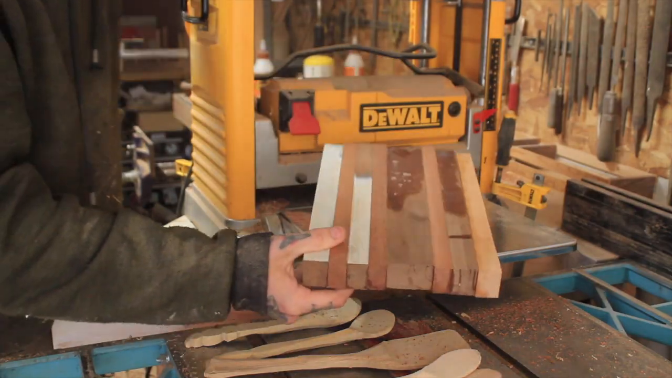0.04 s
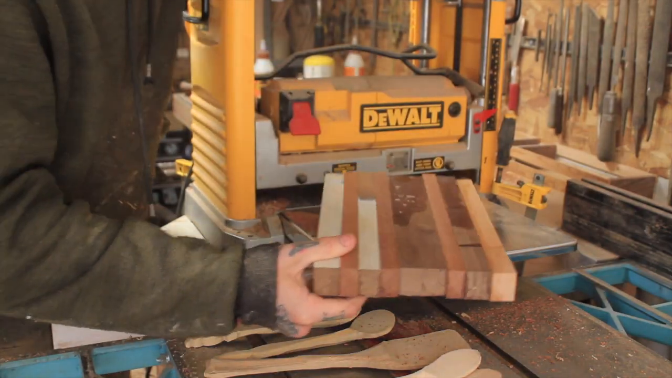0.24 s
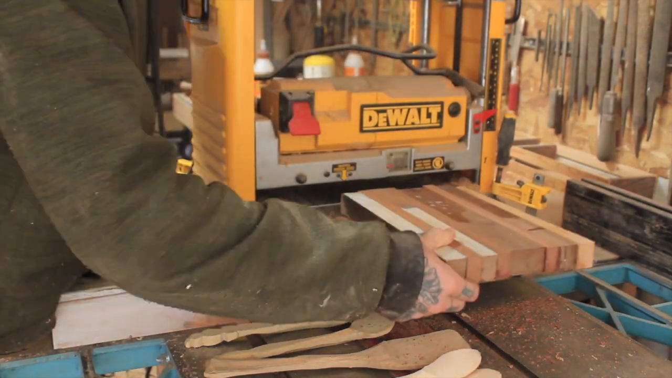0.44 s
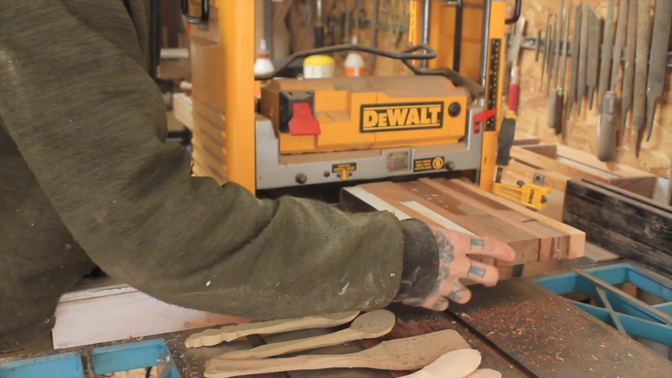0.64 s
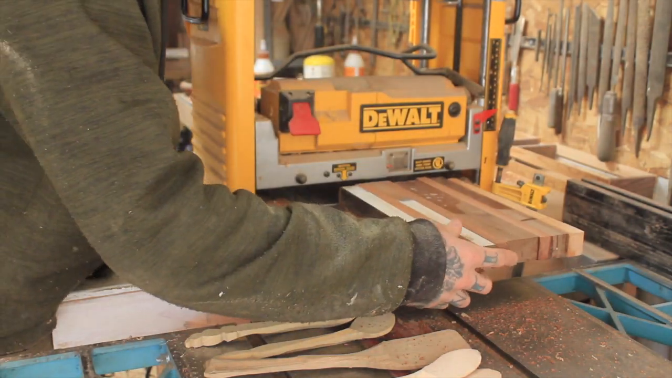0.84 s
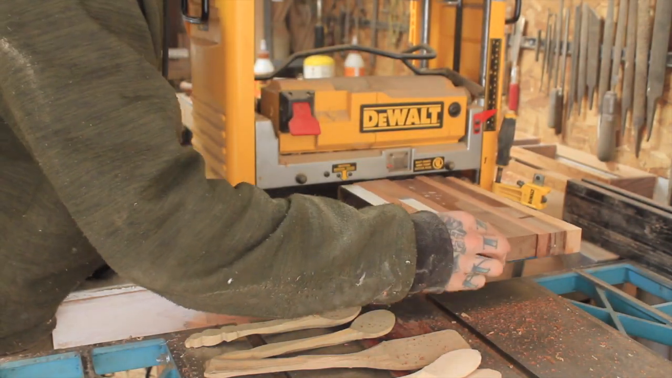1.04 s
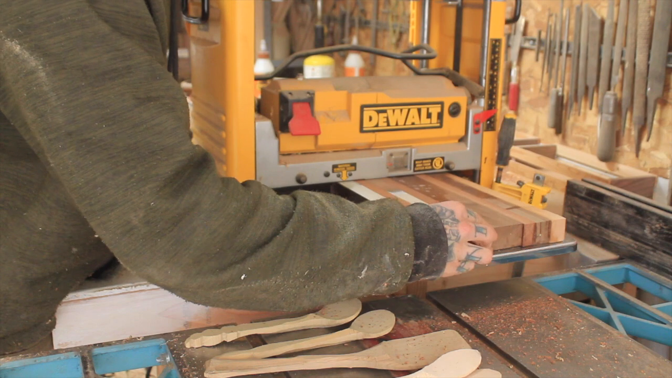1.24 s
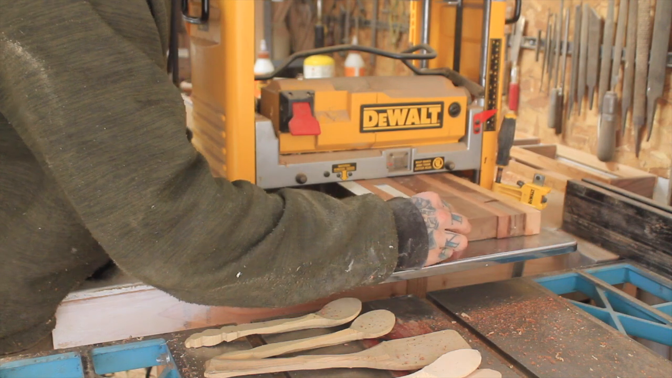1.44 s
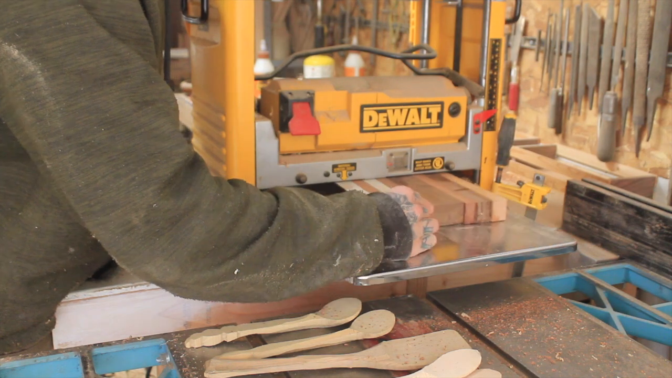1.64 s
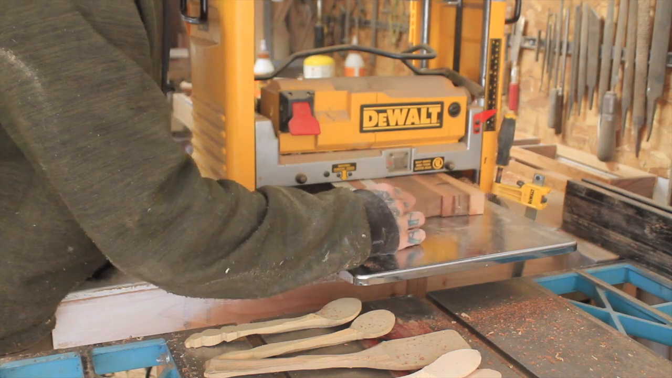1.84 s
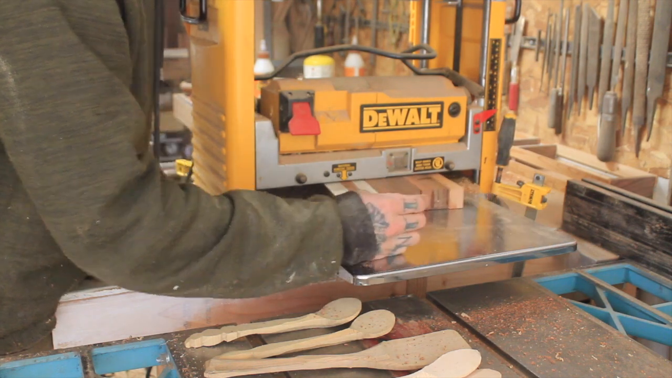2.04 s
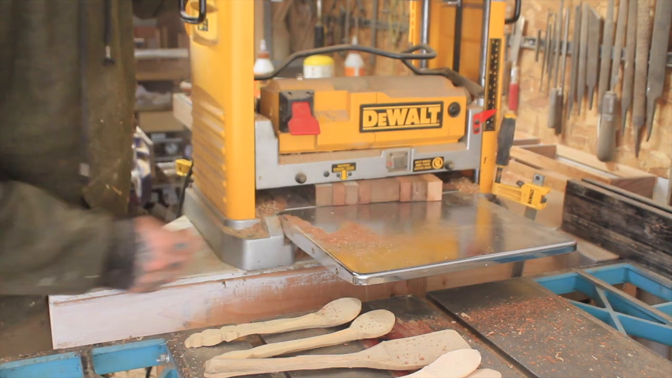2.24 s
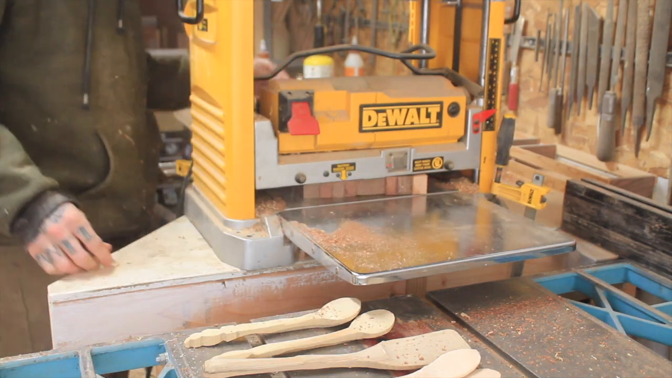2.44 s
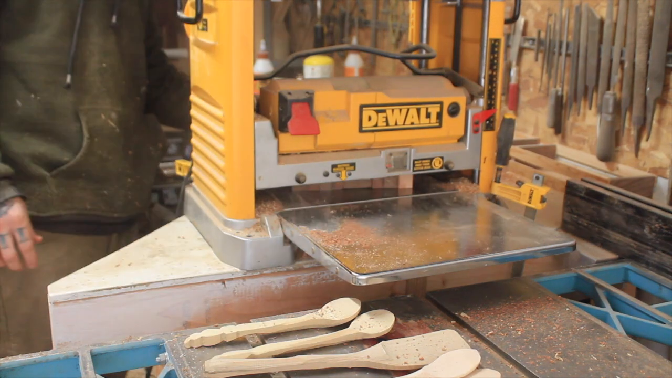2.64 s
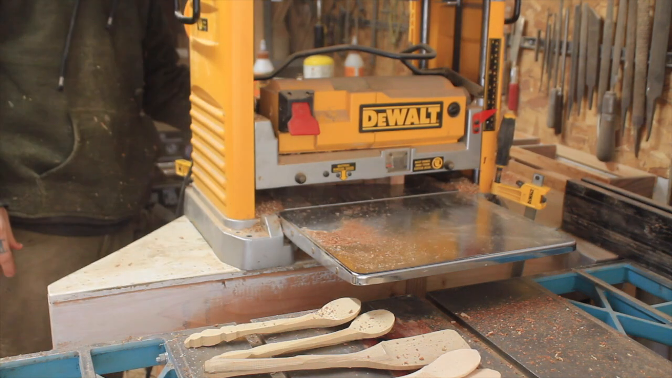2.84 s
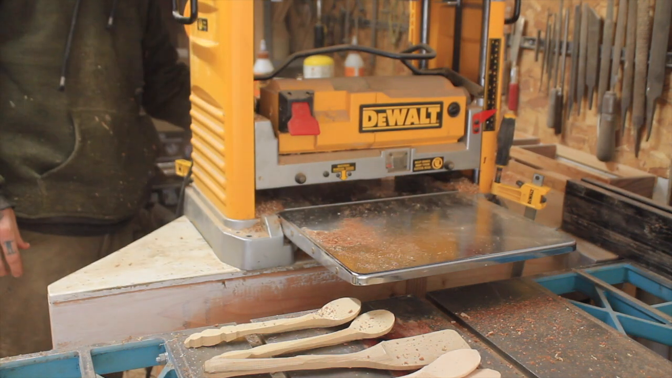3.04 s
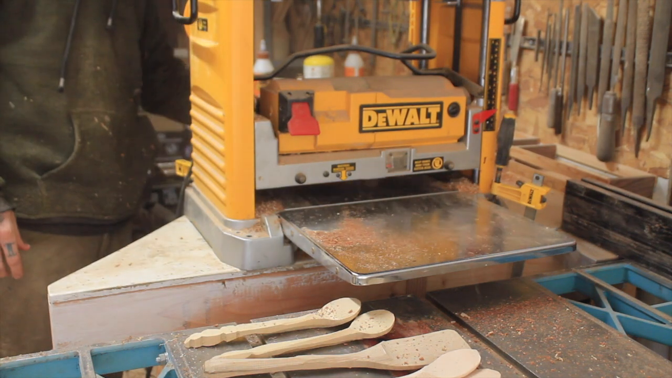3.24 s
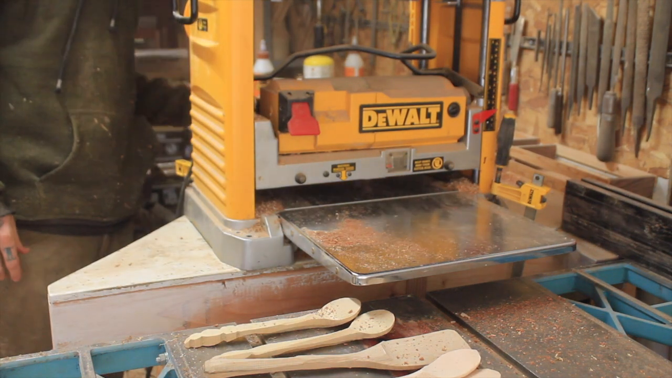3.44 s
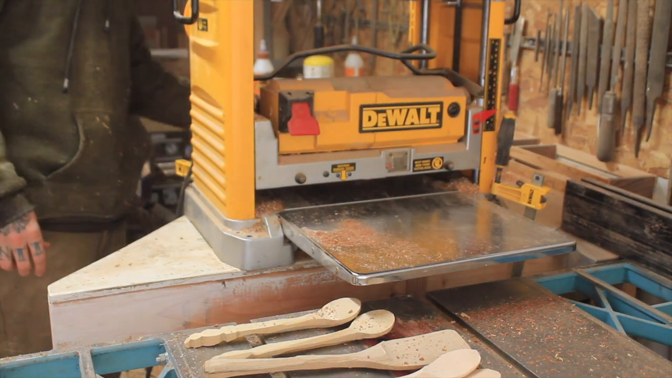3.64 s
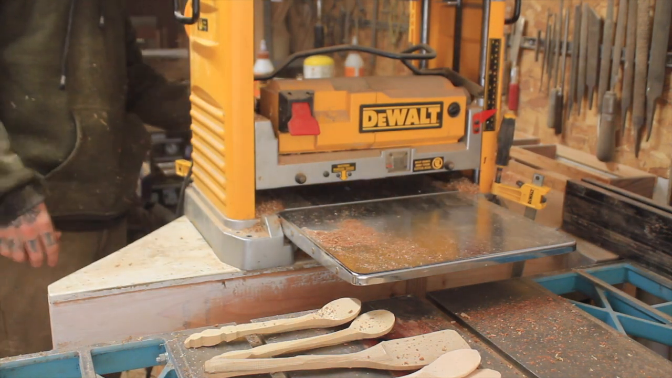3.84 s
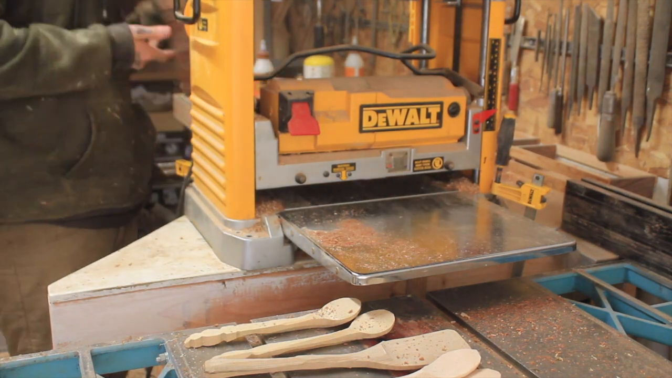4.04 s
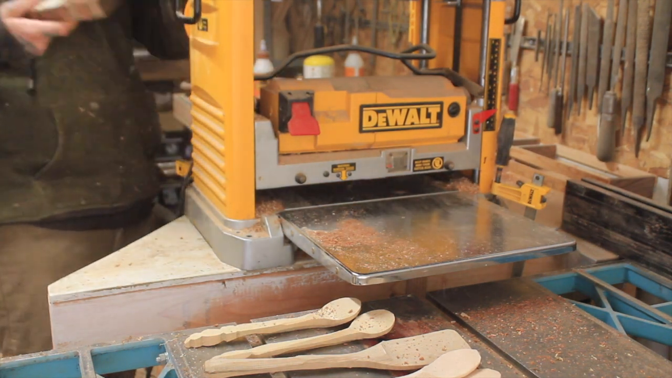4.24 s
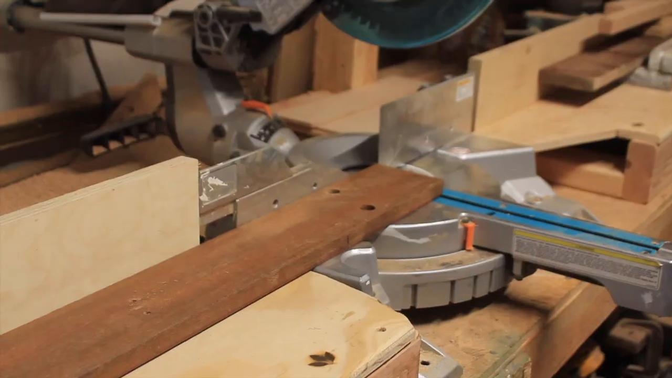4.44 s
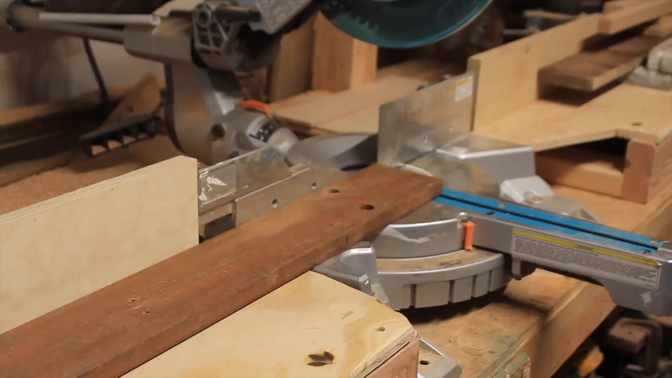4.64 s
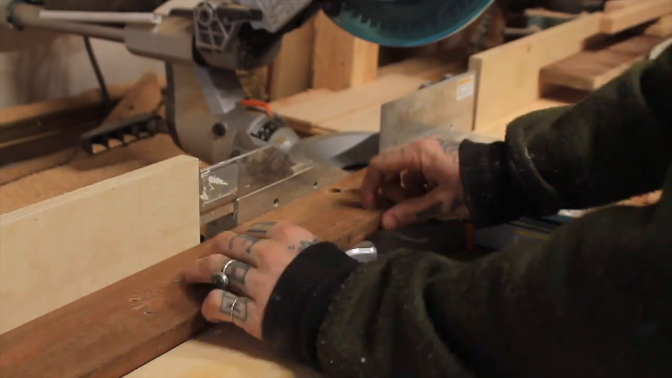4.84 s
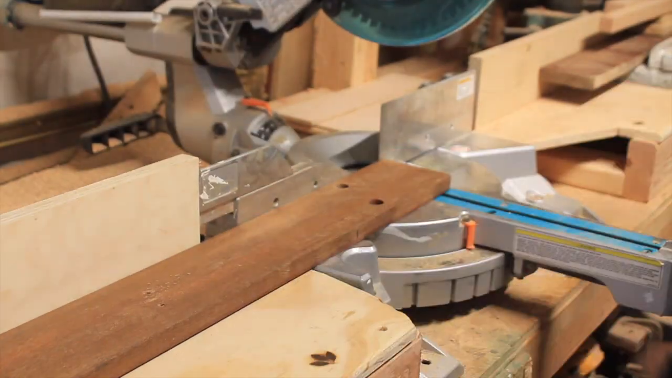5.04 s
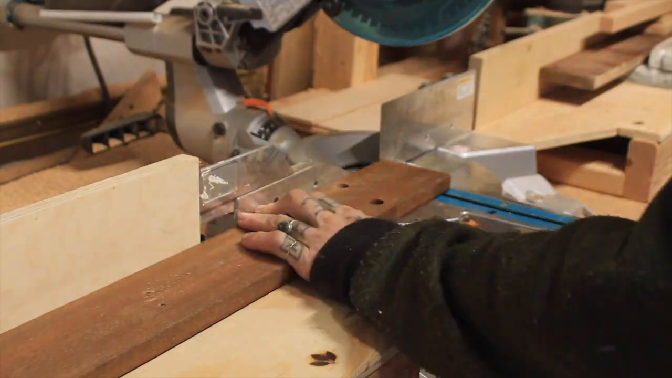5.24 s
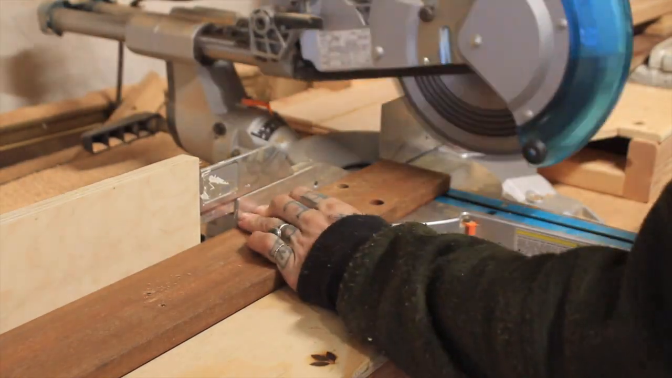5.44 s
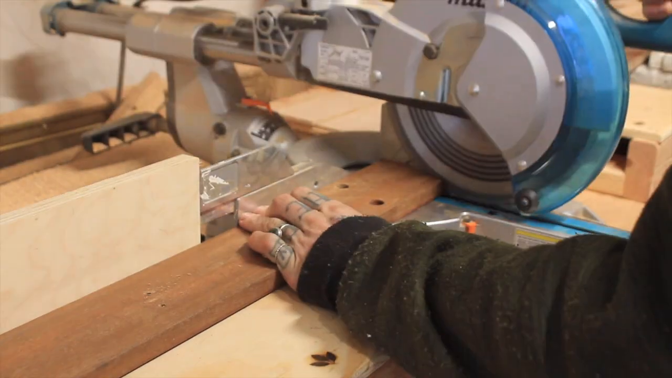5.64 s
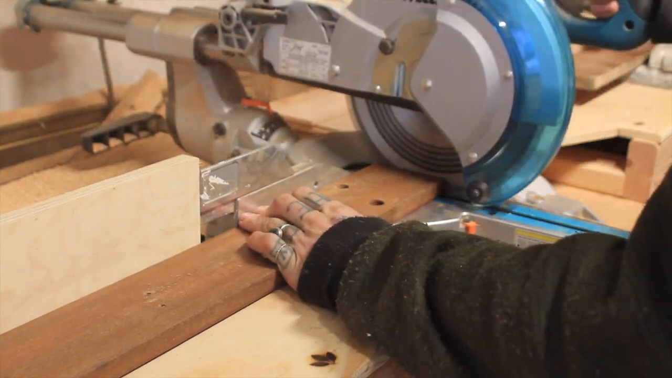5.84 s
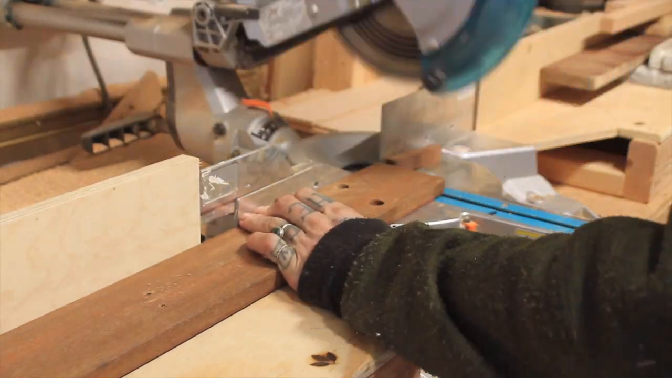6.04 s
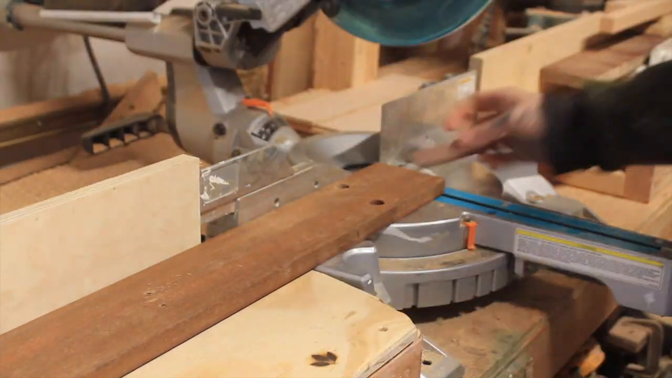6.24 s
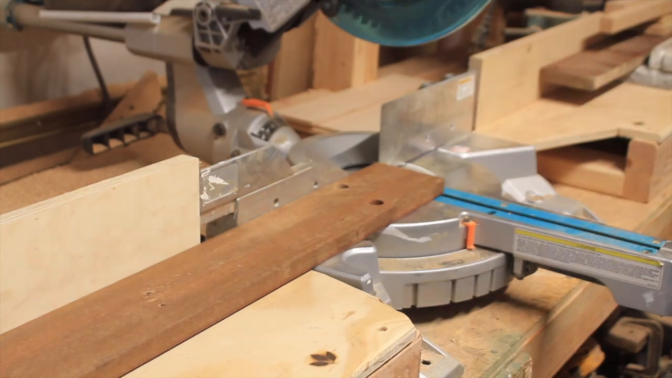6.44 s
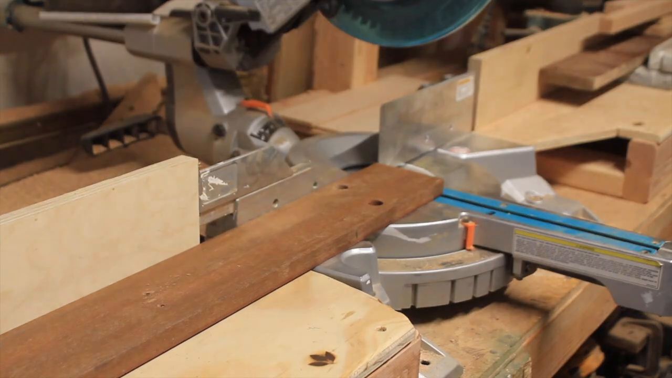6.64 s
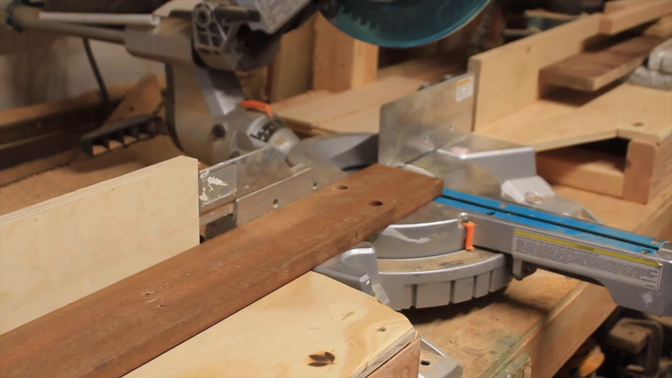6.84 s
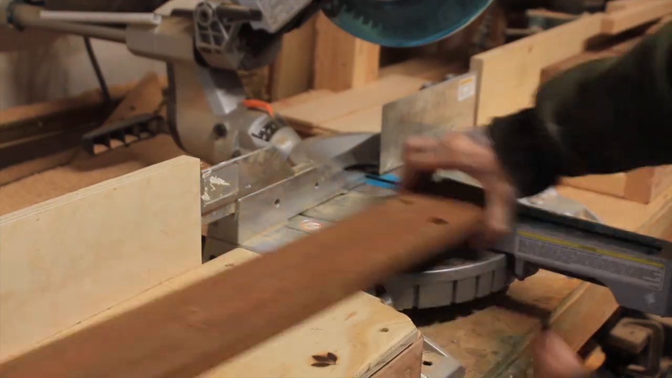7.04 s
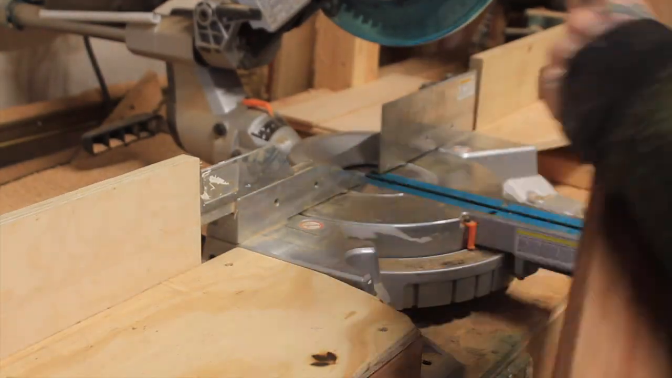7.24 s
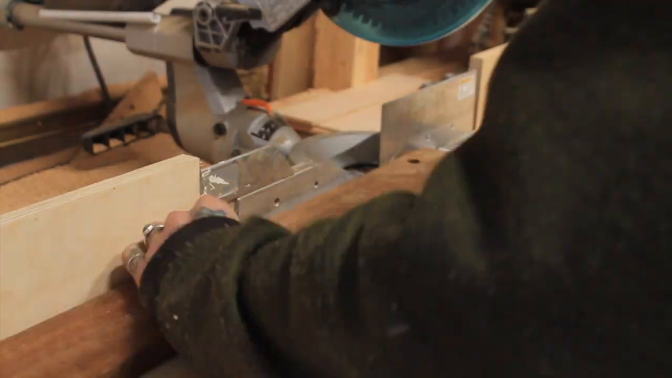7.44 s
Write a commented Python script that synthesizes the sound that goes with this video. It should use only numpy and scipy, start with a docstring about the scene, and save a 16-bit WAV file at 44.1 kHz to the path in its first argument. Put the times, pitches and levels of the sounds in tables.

```python
"""In a small workshop a thickness planer whines, sags while its knives chew through a board, and recovers.
Abruptly the scene is a mitre saw: a board is slid into place, the motor kicks up and brakes,
the blade rings on, and the board is knocked about on the table.
Spinning machines are sums of tones that follow a speed curve, plus noise for rushing air.
Knocks, clicks and slides are short bursts of noise shaped by resonances."""
import sys
import numpy as np
from scipy import signal
from scipy.fft import rfft, irfft, next_fast_len
from scipy.io import wavfile
from scipy.ndimage import uniform_filter1d

SR = 44100
rng = np.random.default_rng(int(sys.argv[2]) if len(sys.argv) > 2 else 0)


def inscribe(sig):
    """Save sig as 16-bit PCM at rate SR to the path in sys.argv[1].

    A 1-D sig is mono; a 2-D sig holds one channel per row.
    Samples are clipped to [-1, 1] before scaling.
    """
    pcm = np.round(np.clip(np.atleast_2d(sig).T, -1, 1) * 32767)
    wavfile.write(sys.argv[1], SR, pcm.astype(np.int16))


N = 331191
T = np.arange(N) / SR  # time [s]

EDGE_HZ = 15780  # upper limit of the sound
IDLE_HZ, PLANER_END = 572.55, 4.366  # knife strokes per second at idle; when the planer scene stops [s]
CUT_START, CUT_END, BITE_RISE_S = 1.615, 3.26, 0.019  # board under the knives from, to [s]; ramp length
SAW_ON, SAW_OFF = 5.45, 6.33  # when the saw starts and when its last motor sound ends [s]

# Spectrum of the planer's air noise and chips: (frequency [Hz], relative level [dB per Hz])
AIR_RUSH = [(100, -45), (300, -105), (520, -11.5), (700, -19), (950, -7), (1300, -1), (1680, 4),
            (2050, -1.5), (2600, 3.5), (3900, -1), (5200, 3.5), (7600, 6.5), (11000, 3.5), (15500, 6)]


def amp(db):
    """Turns decibels into a plain factor."""
    return 10 ** (np.asarray(db) / 20)


def unit(x):
    """Brings a sound to an average (RMS) level of one."""
    return x / np.sqrt(np.mean(x ** 2) + 1e-20)


def read(points, hz):
    """Reads a spectrum in dB, joined on a log-frequency axis."""
    f, db = np.transpose(points)
    return np.interp(np.log(hz + 1), np.log(f + 1), db)


def between(start, end, fade):
    """One from start to end, with short ramps outside."""
    return np.clip((T - start) / fade + 1, 0, 1) * np.clip((end - T) / fade + 1, 0, 1)


def swell(start, end, rise, fall):
    """Attack, hold and release between start and end."""
    return np.clip((T - start) / rise, 0, 1) * np.clip((end - T) / fall, 0, 1)


def bump(hz, centre, width):
    """Shape of a resonance, one at its centre."""
    return 1 / (1 + ((hz - centre) / width) ** 2)


def add(mix, s, sound):
    """Adds a sound to the mix at s seconds."""
    part = mix[round(s * SR):][:len(sound)]
    part += sound[:len(part)]


def drift(rate):
    """Joins random points of unit size, rate per second; after 4096 points the last value holds."""
    knots = rng.standard_normal(4096)
    return np.interp(T * rate, np.arange(len(knots)), knots)


def colour(x, points):
    """Gives a sound a spectrum, at unit level."""
    gain = amp(read(points, np.fft.rfftfreq(len(x), 1 / SR)))
    return unit(irfft(rfft(x) * gain, len(x)))


def noise(points):
    """Steady noise with a given spectrum, at unit level."""
    return colour(rng.standard_normal(next_fast_len(N)), points)[:N]


def bright(x, hz, q):
    """A resonance that rings only after it is hit; a low q makes it broad."""
    b, a = signal.bilinear([1 / q, 0], [1, 1 / q, 1], SR / (2 * np.pi * hz))
    return signal.lfilter(b, a, x)


def thinned(x, hz):
    """Small objects radiate little bass."""
    return signal.lfilter(*signal.butter(1, hz, "high", fs=SR), x)


def reflected(x, wet_db, t60):
    """Adds the dense echoes of nearby bench, walls and housings; they fall 60 dB in t60 seconds."""
    t = T[:8000]
    echoes = rng.standard_normal(len(t)) * amp(-60 * t / t60)
    wet = signal.oaconvolve(x, echoes / np.linalg.norm(echoes))[:len(x)]
    return (x + amp(wet_db) * wet) / np.hypot(1, amp(wet_db))


def crack(hz, t60, q, tail_db=-27, tail_t60=0.073):
    """A quickly dying burst of noise, coloured by a broad resonance, with a faint room tail."""
    t = T[:8000]
    fall = amp(-60 * t / t60) + amp(tail_db - 60 * t / tail_t60)
    burst = bright(rng.standard_normal(len(t)) * fall, hz, q)
    filter_gain = np.linalg.norm(bright(signal.unit_impulse(len(t)), hz, q))
    return burst / filter_gain


def shop(hiss_db=-52.5):
    """Quiet room noise, and between planer and saw a faint, wavering hum that slowly rises."""
    # Room noise: (frequency [Hz], relative level [dB per Hz])
    room_spectrum = [(35, -46), (60, -27.5), (613, -1.5), (773, -5.5), (8870, -14), (9510, -12),
                     (13500, -18), (15500, -23)]
    # Faint hum: (starting pitch [Hz], rise [Hz per s], level [dB])
    hum_tones = [(420, 30, -64.5), (585, 36, -65)]
    age = T - PLANER_END
    hum = 0
    for hz, rise, db in hum_tones:
        turns = (hz + rise * age / 2) * age
        hum = hum + amp(db + 2 * drift(13)) * np.sin(2 * np.pi * turns)
    room = noise(room_spectrum) * amp(hiss_db + .5 * drift(39))
    return room + hum * between(PLANER_END, SAW_ON, 0.12)


def ticks(per_s=16, level_db=-46, spread_db=3, hz=2800, t60=0.059):
    """Light taps at random moments and pitches while the board is handled."""
    # Spells of handling: (start [s], end [s])
    spells = [(4.37, 4.48), (6.799, 7.05)]
    out = np.zeros(N)
    for start, end in spells:
        for s in np.arange(start, end, 1 / per_s):
            size = amp(level_db + spread_db * rng.standard_normal())
            tap = crack(hz * 2 ** rng.uniform(-1.3, 1), t60, q=0.24)
            add(out, s + rng.random() / per_s, size * tap)
    return out


def sliding(grain_db=3, q=0.095, cut_hz=300, ring=0.7):
    """Friction: clumps of tiny slips under a smooth stroke, coloured by the table's short ring."""
    # Wood and sleeve sliding on the table: (time [s], length [s], level [dB], brightness [Hz])
    strokes = [(4.457, 0.09, -42.5, 3440), (4.866, 0.024, -38.5, 6960), (4.911, 0.025, -40.5, 7000),
               (4.939, 0.04, -34.5, 7700), (5.018, 0.031, -41.5, 6960), (5.232, 0.036, -42.5, 5880),
               (5.333, 0.081, -33.5, 4344), (7.078, 0.038, -26.5, 7150), (7.137, 0.043, -29.5, 3860),
               (7.186, 0.07, -42.5, 9000), (7.345, 0.166, -43.5, 8000), (7.415, 0.033, -22.5, 3660)]
    # Resonances of the saw table under a sliding board: (frequency [Hz])
    table_hz = [1850, 3240, 8200]
    out = np.zeros(N)
    slips = rng.standard_normal(N) * amp(grain_db * drift(470))
    slips = slips + ring * sum(bright(slips, hz, q=9.5) for hz in table_hz)
    for s, length, db, hz in strokes:
        piece = slips[round(s * SR):][:round(length * SR)]
        stroke = unit(bright(piece, hz, q))
        add(out, s, amp(db) * stroke * signal.windows.hann(len(stroke)) ** .5)
    return thinned(out, cut_hz)


def clatter(cut_hz=330, wood_q=0.64, top_hz=11500):
    """Knocks ring those modes of the board that the contact favours; clicks are short and bright."""
    # Board knocks: (time [s], level [dB], brightness [Hz], 60 dB decay [s], relative board ring [dB])
    knocks = [(4.404, -30, 1060, 0.091, 3.5), (4.75, -42, 2500, 0.13, 5.5), (5.219, -43, 1487, 0.032, 0),
              (5.34, -31.5, 3960, 0.053, -5), (6.58, -30.5, 1190, 0.03, 0),
              (6.737, -35.5, 1770, 0.017, -0.5), (7.086, -25.5, 1500, 0.028, -1),
              (7.114, -16.5, 2200, 0.047, -0.5), (7.19, -10.5, 1320, 0.029, 1.5),
              (7.408, -15.5, 1850, 0.039, -1.5), (7.434, -23, 2230, 0.066, -3), (7.483, 2, 2470, 0.02, -7),
              (7.501, -17, 1500, 0.036, -5)]
    # Ringing modes of the board: (frequency [Hz], relative level [dB], 60 dB decay [s])
    board_modes = [(464, -15.5, 0.12), (624, -28, 0.17), (767, -19, 0.082), (952, -0.5, 0.028),
                   (1567, -3.5, 0.027), (2134, -14.5, 0.043), (3190, -2, 0.02)]
    # Hard clicks of trigger, guard and fence: (time [s], level [dB], brightness [Hz], 60 dB decay [s])
    clicks = [(4.417, -24.5, 7400, 0.046), (5.008, -45, 8000, 0.022), (5.024, -38, 8000, 0.03),
              (5.055, -39, 4000, 0.022), (5.312, -39.5, 8000, .04), (5.394, -13, 6500, 0.024),
              (6.05, -22.5, 3580, 0.065), (6.201, -19, 2790, 0.091), (6.789, 8, 6150, 0.012),
              (6.8279, -18.5, 9100, 0.04), (7.178, -21, 7500, 0.019), (7.302, -36, 9300, 0.077),
              (7.483, -1.5, 5960, 0.034)]
    out, t = np.zeros(N), T[:8000]
    for s, db, hz, t60, ring_db in knocks:
        ring = 0
        for f, d, decay in board_modes:
            mode_hz = f * (1 + 0.012 * rng.standard_normal())  # each knock is tuned a little differently
            ring = ring + amp(d - 60 * t / decay) * np.sin(2 * np.pi * mode_hz * t)
        contact = crack(hz, t60, q=1.24)
        add(out, s, amp(db) * (contact + amp(ring_db) * bright(ring, hz, wood_q)))
    soften = signal.butter(2, min(top_hz, EDGE_HZ), fs=SR)
    for s, db, hz, t60 in clicks:
        add(out, s, amp(db) * signal.lfilter(*soften, crack(hz, t60, q=0.41)))
    return thinned(out, cut_hz)


def blade(rise_s=0.058):
    """The steel disc rings on in pure, fading tones, and is dulled as the board is picked up."""
    # Tones after braking: (frequency [Hz], level [dB], 60 dB decay [s], start [s])
    disc_tones = [(2844, -33.5, 4.3, 6.31), (4140, -43.5, 1.03, 6.22), (5760, -48, 2.7, 6.25),
                  (8258, -50, 3.7, 6.22), (9338, -51, 5.7, 6.22), (10515, -53, 2, 6.22),
                  (15050, -38.5, 1.7, 6.22)]
    out = 0
    for hz, db, t60, start in disc_tones:
        age = np.maximum(T - start, 0)
        size = amp(db - 60 * age / t60) * np.minimum(age / rise_s, 1)
        out = out + size * np.sin(2 * np.pi * hz * T)
    return out * amp(np.interp(T, [7.0, 7.25], [0, -14]))


def squeals(q=10):
    """A narrow resonance of the gear housing flares up briefly."""
    # Squeals as the saw gains speed and is braked: (time [s], length [s], frequency [Hz], level [dB])
    flares = [(5.515, .016, 4600, -21), (6.096, .005, 4500, -21), (6.138, .013, 4600, -24.5)]
    out = 0
    for s, length, hz, db in flares:
        once = bright(rng.standard_normal(N), hz, q)
        ring = unit(bright(once, hz, q))
        out = out + amp(db) * ring * np.exp(-.5 * ((T - s) / length) ** 2)
    return out


def jolts():
    """The starting current shakes the frame: it rattles briefly and hums on."""
    # Switching on, then gears taking up: (time [s], hold [s], rattle [dB], hum [Hz], hum level [dB])
    kicks = [(5.4, 0.048, -24.5, 368, -39.5), (5.45, 0.04, -15.5, 619, -25.5)]
    # Rattling frame: (frequency [Hz], relative level [dB per Hz])
    rattle_spectrum = [(150, -35), (400, -15.5), (900, -9.5), (1900, -7.5), (3000, 8.5), (3800, 2.5),
                       (4500, 0), (6500, -4), (15500, -8)]
    rattle_t60, hum_t60, tail_db, tail_t60 = .17, 0.16, -19, .8  # 60 dB decays [s]; slow hum tail [dB]
    out = 0
    for s, hold, rattle_db, hz, hum_db in kicks:
        age = np.maximum(T - s, 0)
        fade_db = 60 * np.maximum(age - hold, 0) / rattle_t60
        rattle = noise(rattle_spectrum) * amp(rattle_db + 2 * drift(400) - fade_db)
        hum = sum(amp(db) * np.sin(2 * np.pi * (k + 1) * hz * T) for k, db in enumerate([3, -2, -6]))
        fall = amp(-60 * age / hum_t60) + amp(tail_db - 60 * age / tail_t60)
        out = out + reflected(rattle, wet_db=2.0, t60=0.03) * between(s, SAW_OFF, .003)
        out = out + amp(hum_db) * fall * hum * between(s, SAW_OFF, 0.016)
    return out


def mitre_saw(teeth=54, wobble=0.61, offset=0.62, torque_offset=0.3, overtone_db=-4.0, hunt_hz=15):
    """Gear whine with once-a-turn sidebands sweeps through its case's resonances; blade wind follows speed."""
    # Resonances of the gear case: (frequency [Hz], width [Hz], boost [dB])
    gear_case = [(4640, 290, 13), (10720, 160, 12), (13400, 760, 14.5)]
    # Wind of the blade: (frequency [Hz], relative level [dB per Hz])
    wind_spectrum = [(150, -49), (600, -24), (1300, -10.5), (2300, 3), (3300, 4), (5300, -3), (8500, 2),
                     (10800, 5), (15500, 3.5)]
    half_speed_at, spin_up_s, top_hz = 5.532, 0.042, 10770  # gear-mesh pitch climbs along an S-curve
    creep_at, creep_hz_per_s = 5.95, 5500  # the free blade gains a little more just before the brake
    brake_at, brake_s, crawl_hz = 6.047, .05, 451  # the brake slows it exponentially
    gear_db, torque_db, gear_stop = -35.5, 6, 6.22  # whine level; its gain under torque; its end [s]
    wind_db, wind_power = -26.5, 0.48  # wind at top speed; power of the speed

    spin_up = .5 + .5 * np.tanh((T - half_speed_at) / (2 * spin_up_s))
    creep = creep_hz_per_s * (np.clip(T, creep_at, brake_at) - creep_at)
    top = top_hz + creep + hunt_hz * drift(40)
    braking = np.exp(-np.maximum(T - brake_at, 0) / brake_s)
    mesh = crawl_hz + (top - crawl_hz) * spin_up * braking
    angle = 2 * np.pi * np.cumsum(mesh) / SR
    torque = np.tanh(abs(np.gradient(mesh, T)) / 15000)  # large while the speed changes
    runout = 1 + wobble * np.exp(1j * angle / teeth) + .5 * wobble * np.exp(-1j * angle / teeth)
    gear = 0
    for k in np.arange(1, 4):
        # This fast drift already holds its last value when the saw starts: one random offset per overtone
        phase = k * angle + (offset + torque_offset * torque) * drift(900)
        case_db = sum(db * bump(k * mesh, hz, width) for hz, width, db in gear_case)
        size = amp(overtone_db * (k - 1) + case_db) * (k * mesh < EDGE_HZ)
        gear = gear + size * (runout * np.exp(1j * phase)).real
    whine = reflected(gear, wet_db=0, t60=0.1) * amp(gear_db + torque_db * torque)
    wind = noise(wind_spectrum) * amp(wind_db) * (mesh / top_hz) ** wind_power
    return whine * swell(SAW_ON, gear_stop, 0.015, 0.11) + wind * swell(SAW_ON, SAW_OFF, 0.014, 0.072)


def head_speed(inertia_s=.183):
    """Knife strokes per second: the heavy cutter head follows its load with a lag."""
    # Drag of the board: (time [s], speed that it takes away [knife strokes per s])
    drag = [(1.595, 0), (1.68, 200), (1.769, 181), (1.901, 218), (2.144, 167), (2.481, 171), (2.549, 198),
            (2.642, 171), (2.672, 183), (2.817, 167), (2.916, 205), (3.046, 119), (3.197, 0)]
    keep = np.exp(-1 / (inertia_s * SR))
    loss = np.interp(T, *np.transpose(drag))
    return IDLE_HZ - signal.lfilter([1 - keep], [1, -keep], loss)


def whistles(waver_db=5.0, flutter=0.37, fade=0.038):
    """Air whistles past the knives in unsteady overtones, loudest at the resonance of the chip hood."""
    # Whistles, also from the narrowing gap ahead of the board: (start [s], end [s], overtone, level [dB])
    gusts = [(1.457, 1.673, 6, -31.5), (1.427, 1.655, 8, -33.5), (1.687, 2.0, 6, -26.5),
             (2.69, 4.45, 6, -31)]
    hood_hz, hood_width_hz, hood_db = 2500, 95, 10  # the whistle sweeps through this resonance
    speed, out = head_speed(), 0
    for start, end, overtone, db in gusts:
        hz = round(overtone) * speed
        size = amp(db + hood_db * bump(hz, hood_hz, hood_width_hz) + waver_db * drift(14))
        tone = np.sin(2 * np.pi * np.cumsum(hz) / SR + flutter * drift(40))
        out = out + size * swell(start, end, fade, fade) * tone
    return np.sqrt(2) * out


def knives(grain_db=7, chips_db=-14, entry_db=9, edge_db=6, edge_hz=7300, edge_width_hz=1200):
    """Each knife stroke slaps the board; changing grain shifts the overtones, and chips spray."""
    # How board and housing radiate the strokes: (frequency [Hz], relative level [dB])
    housing = [(400, -34), (800, -26), (1200, -14), (1600, 1.5), (1980, -13), (2400, -5), (2800, -9),
               (3100, -13), (3600, -3.5), (4200, -10.5), (4780, 1.5), (5200, -2.5), (5550, -10),
               (5950, -1.5), (6500, -11), (12500, -13), (16000, -21)]
    boom_order = 3  # the overtone at which the board booms
    bite_db, ease_s, ease_db = -13.5, .13, -15  # cutting level; it eases off over the last moments

    speed = head_speed()
    vigour = (speed - speed.min()) / np.ptp(speed)  # 0 at the slowest, 1 at the fastest
    turns = np.cumsum(speed) / SR
    angle = 2 * np.pi * turns + .012 * drift(120)
    slaps = 0
    for k in np.arange(1, 41):
        boom_db = entry_db * (k == boom_order) * vigour  # the board booms before the motor sags
        # fast strokes are brighter
        shriek_db = edge_db * np.sqrt(vigour) * bump(k * speed, edge_hz, edge_width_hz)
        grain = grain_db * np.tanh(k / 6) ** 2 * np.tanh(drift(8))
        size = amp(read(housing, k * speed) + boom_db + shriek_db + grain)
        slaps = slaps + size * np.cos(k * angle + 2 * np.pi * rng.random())
    # echoes beat against the gliding overtones
    slaps = reflected(slaps, wet_db=-6, t60=0.16)
    slaps = slaps / np.sqrt(uniform_filter1d(slaps ** 2, size=4000))  # evens out the loudness
    # chips spray hardest at the start of each stroke
    chips = colour(rng.standard_normal(N) * np.exp(-(turns % 1) / .5), AIR_RUSH)
    bite = amp(bite_db + ease_db * np.clip(1 + (T - CUT_END) / ease_s, 0, 1))
    return (slaps + amp(chips_db) * chips) * bite * swell(CUT_START, CUT_END, BITE_RISE_S, BITE_RISE_S)


def planer(flutter=0.091, chop=0.34, waver_db=2, gust_db=1.0):
    """Tones and chopped air of the spinning head fall with its speed; the board muffles both as it passes."""
    # Tones of cutter head, fan and motor: (frequency at idle [Hz], relative level [dB])
    whine_tones = [(573, -34), (1130, -31), (1719, -24.5), (3438, -33), (6761, -38), (7892, -31),
                   (9037, -37), (10575, -40), (10709, -36), (11413, -41), (11856, -31.5), (12430, -33.5),
                   (13562, -22), (14682, -35)]
    # level at idle; power of the speed; change while the board is inside
    whine_db, whine_power, whine_muffle_db = -2, 5.7, -9.5
    rush_db, rush_power, rush_muffle_db = -17.5, 0.92, -3

    speed = head_speed()
    pace = speed / IDLE_HZ
    inside = swell(CUT_START, CUT_END, BITE_RISE_S, BITE_RISE_S)
    angle = 2 * np.pi * np.cumsum(speed) / SR + flutter * drift(35)  # belt flutter smears the highest tones
    tones = 0
    for hz, db in whine_tones:
        size = amp(db + waver_db * np.sqrt(hz / 8000) * drift(25.24))  # high tones waver most
        tones = tones + size * np.sin(angle * hz / IDLE_HZ)
    tones = tones * amp(whine_db + whine_muffle_db * inside) * pace ** whine_power
    air = colour(rng.standard_normal(N) * (1 + chop * np.cos(angle)), AIR_RUSH)
    air = air * amp(rush_db + rush_muffle_db * inside + gust_db * drift(25.3)) * pace ** rush_power
    return np.sqrt(2) * tones + air


def scene():
    """The planer stops abruptly and the saw follows; the same sound goes to both channels."""
    planing = (planer() + whistles() + knives()) * between(0, PLANER_END, 0.00067)
    sawing = mitre_saw() + jolts() + squeals() + blade()
    mono = planing + sawing + clatter() + sliding() + ticks() + shop()
    return np.array([mono, mono])


def record(dry, recover_db=170):
    """A peak limiter ducks everything briefly after the hardest clacks; then the top treble is cut off."""
    over_db = 20 * np.log10(np.maximum(abs(dry).max(0), 1))
    # the ducking recovers by recover_db each second
    held_db = np.maximum.accumulate(over_db + recover_db * T) - recover_db * T
    low_pass = signal.firwin(801, EDGE_HZ, window=("kaiser", 8), fs=SR)
    return signal.oaconvolve(dry / amp(held_db), low_pass[None], "same", axes=1)


dry = scene()
out = record(dry)
inscribe(out)
```